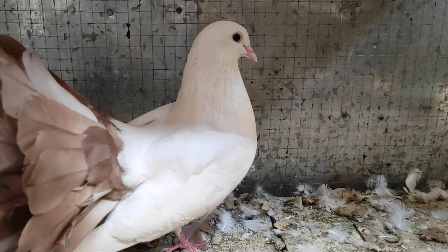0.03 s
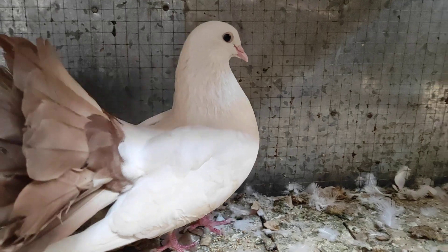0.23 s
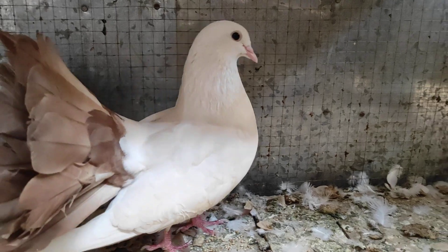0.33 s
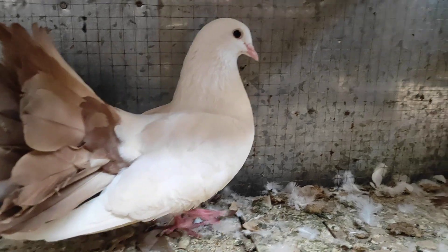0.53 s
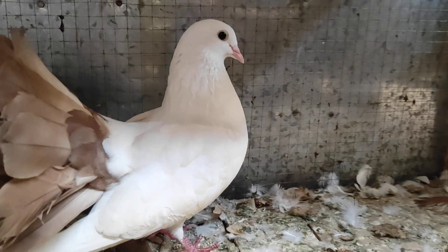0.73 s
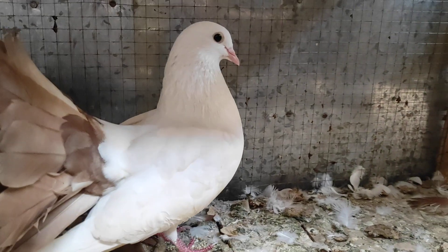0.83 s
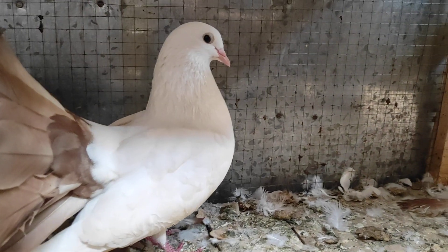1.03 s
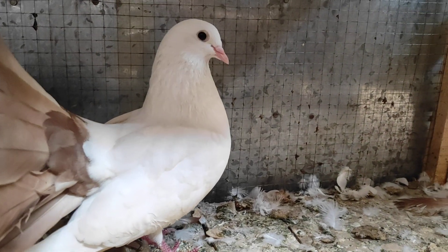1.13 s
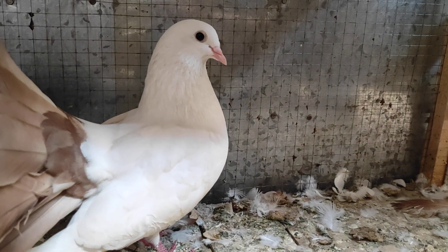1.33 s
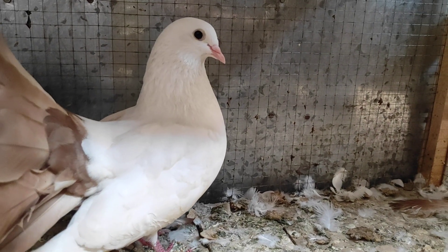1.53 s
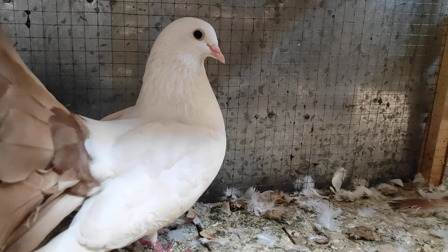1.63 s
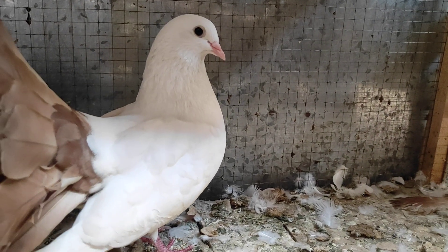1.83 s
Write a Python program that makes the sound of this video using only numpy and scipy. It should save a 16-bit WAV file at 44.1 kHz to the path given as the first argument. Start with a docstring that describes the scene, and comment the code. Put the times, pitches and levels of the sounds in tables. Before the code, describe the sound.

Light pigeon footsteps and soft feather rustling close by, over a faint hiss.

```python
"""A small aviary with a gritty floor, where a fantail pigeon shuffles round close to the microphone.
Its claws tap and scratch, its toes knock the board, its soles scuff and its weight bumps the floor.
Its feathers rustle, brush and flick past each other, and its swinging tail pushes air at the microphone.
The walls give a short echo; an outdoor rumble, a thin hiss and a swelling low hum lie underneath."""
import sys
import numpy as np
from scipy import signal
from scipy.fft import rfft, irfft
from scipy.io import wavfile

SR = 44100
rng = np.random.default_rng(int(sys.argv[2]) if len(sys.argv) > 2 else 0)


def to_wav(s):
    """Save 16-bit WAV."""
    ch = np.atleast_2d(s).T  # columns
    pcm = np.round(np.clip(ch, -1, 1) * 32767)  # PCM
    wavfile.write(sys.argv[1], SR, pcm.astype(np.int16))


N = 83790
T = np.arange(N) / SR

# Claw hits. Each row: start in seconds, level in dB, decay time in seconds, then the trims of the
# dull and the crisp layer in dB.
CLAW_HITS = [(0.2891, -40, 0.0023, -7, -10), (0.299, -50, 0.0016, -5, -12), (0.306, -46, 0.0029, -6.5, -17),
             (0.3144, -42.5, 0.0009, -2.5, -19), (0.5388, -45, 0.0019, -12, -30),
             (0.5533, -27.5, 0.0005, -9.5, -41), (.5578, -32, 0.00028, -1, -39),
             (.5822, -24, 0.00034, -10.5, -27), (0.7037, -27, 0.0021, -14.5, -12),
             (0.7065, -35.5, 0.00086, -3.5, -20), (0.7265, -46.5, 0.0013, 1, -20),
             (.7670, -50.5, 0.0017, -16, -22)]
# Toe knocks. Each row: start in seconds, level in dB.
TOE_KNOCKS = [(0.5401, -48), (.555, -43), (.5581, -42), (0.5838, -43.5), (0.7056, -44.5)]
# The ring of the floor board. Each row: pitch in Hz, trim in dB, time to fall 60 dB in seconds.
BOARD_MODES = [(992, -9.5, 0.048), (1304, -14, 0.028), (1773, -2, 0.02), (2490, -0.5, 0.014),
               (4480, -8, 0.0083)]
# Weight on the floor. Each row: start in seconds, level in dB, pitch in Hz, time to fall 60 dB in seconds.
FLOOR_BUMPS = [(.287, -42, 88, 0.063), (.3045, -39, 99, 0.027), (0.525, -39, 247, 0.032),
               (.557, -46.5, 306, 0.054), (0.7075, -34.5, 315, 0.055), (1.303, -46, 106.5, 0.082)]

# Friction cues. Each row: start in seconds, length in seconds, level in dB.
SOLE_SCUFFS = [(.118, 0.059, -60.5), (.372, 0.018, -59.5), (.403, 0.019, -50.5), (.492, 0.057, -60),
               (.535, 0.086, -63.5), (1.15, 0.043, -60.5)]
VANE_FLICKS = [(1.15, 0.031, -59.5), (1.275, 0.035, -69), (1.412, 0.023, -59), (1.466, 0.0072, -49.5),
               (1.5135, 0.0038, -45), (1.560, .02, -50), (1.607, 0.014, -50.5), (1.657, 0.023, -55.5),
               (1.700, 0.012, -60), (1.748, 0.02, -61)]
TIP_BRUSHES = [(.165, 0.11, -70), (.287, 0.024, -58.5), (.495, 0.078, -68), (1.145, 0.071, -66),
               (1.272, 0.067, -64), (1.41, 0.2, -69), (1.74, 0.054, -67), (1.78, 0.26, -72)]

# EQ curves. Each row: frequency in Hz, relative gain in dB.
CLAW_EQ = [(200, -26), (1500, -42), (3200, -10.5), (3900, -13.5), (4450, -6.5), (5100, -8.5), (5900, -3),
           (6450, 4.5), (6950, 4), (7400, -3.5), (8000, -0.5), (9000, -12), (10500, -25.5), (14000, -38),
           (16000, -58)]  # sharp claw
CRISP_EQ = [(1000, -19.5), (6000, 0), (9500, -7), (11500, -11), (14000, -12.5), (16000, -18)]  # crisp edge of grit and feather tips
FLOOR_EQ = [(100, -32), (300, 3.5), (600, 3.5), (1000, -0.5), (1350, 2), (1750, -4.5), (2100, -0.5),
            (2500, -2.5), (3200, -1), (5000, -8.5), (9000, -40)]  # dull floor under the claw
GRIT_EQ = [(200, 3.5), (600, -8), (1500, -2.5), (2800, 1), (4500, -7.5), (6800, -6), (8500, -7.5),
           (10500, -36), (15000, -37)]
PLUMAGE_EQ = [(300, -17.5), (1000, -1.5), (2500, -6.5), (3600, -3.5), (5000, -2), (6000, 0), (7000, 5),
              (8400, -1), (9300, -8.5), (10500, -25), (14000, -24.5), (16000, -45)]
VANE_EQ = [(300, -19), (1000, -16), (3200, -21), (4800, -5), (6000, -1.5), (7000, 4.5), (8400, -3.5),
           (10500, -17), (14000, -21), (16000, -46)]
BUFFET_EQ = [(3, -4), (12, -1), (25, -10), (50, -20), (120, -25), (500, -90)]
RUMBLE_EQ = [(15, -9.5), (28, -6), (42, -1.5), (58, -1.5), (80, -3), (115, -0.5), (160, -6), (240, -15.5),
             (370, -10.5), (550, -19.5), (900, -32.5), (2000, -76)]
HISS_EQ = [(60, -18.5), (240, -14.5), (550, -11.5), (800, -16), (1300, -22), (2400, -26), (4000, -33),
           (7000, -33), (9000, -36), (10000, -52.5), (12500, -43.5), (15000, -92)]

# Fader moves. Each row: time in seconds, level in dB.
RUSTLE_FADER = [(.07, -82), (.17, -61.5), (.27, -62.5), (.32, -57.5), (.35, -64), (.39, -62.5), (.45, -78),
                (.485, -70.5), (.505, -56), (.6, -70), (.68, -66.5), (.75, -62), (.83, -71), (.95, -71.5),
                (1.1, -65), (1.3, -63.5), (1.38, -62.5), (1.5, -61.5), (1.9, -62)]
BUFFET_FADER = [(.1, -90), (.16, -56), (.28, -48), (.35, -67), (.6, -56), (.9, -57), (1.9, -79)]
RUMBLE_FADER = [(.07, -100), (.12, -65.5), (.18, -55.5), (.3, -55.5), (.6, -53), (1.0, -54), (1.5, -52),
                (1.9, -54.5)]
HISS_FADER = [(.07, -67), (.15, -61), (.3, -60.5), (.6, -58.5), (.9, -61), (1.2, -60.5), (1.9, -61)]
HUM_FADER = [(.35, -79), (.46, -56), (.54, -49), (.65, -79), (.85, -76), (1.0, -63.5), (1.25, -52),
             (1.4, -82), (1.7, -63.5), (1.85, -59.5)]

# Stereo likeness of the noise beds. Each row: frequency in Hz, correlation of left and right.
BED_CORRELATION = [(40, 0.64), (120, 0.9), (350, 0.7), (700, 0.41), (1400, 0.045), (8000, 0.065)]
# Stereo balance. Each row: frequency in Hz, left minus right in dB.
BED_PAN = [(60, 4), (400, 5.5), (1300, 4.5), (2400, 7.5), (4400, -0.5), (8000, 3)]
PORT_PAN = [(1500, 0), (4700, 0.5), (5500, 1.5), (6200, -6), (7200, -7), (7900, 4), (8800, 0.5),
            (10500, -2.5), (15000, 0)]
# Early echoes off floor and walls. Each row: delay in seconds, level against the direct sound in dB.
EARLY_ECHOES = [(.0011, -9), (.0033, -11), (.0046, -8.5), (.0088, -12)]


def claws(snap_ratio=4.1):
    """Each claw lands with a snap and a brief scratch, in three layers: bright, crisp and dull."""
    bright, dull, crisp = np.zeros((3, 2, N))
    t = np.arange(0, .02, 1 / SR)
    for start, db, decay, dull_db, crisp_db in CLAW_HITS:
        noise = rng.standard_normal((2, 3, len(t)))  # claw and ground, each with left, right and centre
        scratch = (noise[:, :2] + 0.67 * noise[:, 2:]) * (t / decay) ** 0.33 * np.exp(-t / decay)
        attack_rms = np.sqrt(np.mean(scratch[..., :round(decay * SR)] ** 2))
        scratch[..., 0] += snap_ratio * attack_rms  # first touch
        scratch *= np.sqrt(decay * SR / 2) / np.linalg.norm(scratch, axis=-1, keepdims=True)
        claw, ground = scratch
        add(bright, start, amp(db) * claw)
        add(dull, start, amp(db + dull_db) * ground)
        add(crisp, start, amp(db + crisp_db) * ground)
    return eq(bright, CLAW_EQ) + eq(crisp, CRISP_EQ) + eq(dull, FLOOR_EQ) * pan(db=4.5)


def toe_knocks(attack_s=0.00053):
    """The board rings briefly under the toes, tuned a little differently at each spot."""
    out = np.zeros((2, N))
    t = np.arange(0, .1, 1 / SR)
    for start, db in TOE_KNOCKS:
        detunes = 1 + 0.021 * rng.uniform(-0.84, 1, len(BOARD_MODES))
        ring = sum(amp(mode_db - 60 * t / t60) * np.sin(2 * np.pi * hz * detune * t)
                   for (hz, mode_db, t60), detune in zip(BOARD_MODES, detunes))
        add(out, start, amp(db) * (1 - np.exp(-t / attack_s)) * ring)
    return out * pan(db=1)


def floor_bumps(attack_s=0.0028, overtone_ratio=1.85, overtone_db=-12.5):
    """The floor gives a short low note under the bird's weight."""
    out = np.zeros((2, N))
    t = np.arange(0, .2, 1 / SR)
    for start, db, hz, t60 in FLOOR_BUMPS:
        phase = 2 * np.pi * hz * t
        note = np.sin(phase) + amp(overtone_db) * np.sin(phase * overtone_ratio)
        envelope = amp(db - 60 * t / t60) * (1 - np.exp(-t / attack_s))
        add(out, start, envelope * note)
    return out * pan(db=2.3)


def sole_scuffs():
    """Grit drags under the soles in short, grainy strokes."""
    return eq(grains() * strokes(SOLE_SCUFFS), GRIT_EQ) * pan(db=2.5)


def feathers():
    """Barbs rub all the while, stiff vanes slip past each other in a quick run, and tips brush softly."""
    rustle = eq(grains() * fader(RUSTLE_FADER), PLUMAGE_EQ)
    flicks = eq(grains() * strokes(VANE_FLICKS), VANE_EQ)
    brushes = eq(grains(spread_db=5) * strokes(TIP_BRUSHES), CRISP_EQ)  # tips catch unevenly: papery
    return rustle + flicks + brushes


def tail_draught(start_s=0.15, attack_s=0.018, swing_hz=1.3, t60=3.5):
    """The tail pushes air at the microphone in one sudden push, which the microphone answers with a slow, dying
    swing; very deep buffeting follows."""
    t = np.maximum(T - start_s, 0)
    envelope = amp(-32.5 - 60 * t / t60) * (1 - np.exp(-t / attack_s))
    push = envelope * np.cos(2 * np.pi * swing_hz * t)
    return push + noise_bed(BUFFET_EQ) * fader(BUFFET_FADER)


def aviary_echo(x):
    """Floor and walls throw back a few close echoes, a quick scatter and a short tail."""
    t = np.arange(0, .4, 1 / SR)
    response = np.zeros((2, len(t)))
    fade_in = np.minimum(t / 0.002, 1)
    for t60, db in [(0.032, -2), (0.15, -8)]:  # scatter, then tail
        reverb = rng.standard_normal(response.shape) * amp(-60 * t / t60) * fade_in
        response += amp(db) * reverb / np.linalg.norm(reverb[0])
    response[:, 0] += 1  # direct sound
    for delay, db in EARLY_ECHOES:
        for ear, stretch in enumerate(rng.uniform(.88, 1.12, 2)):
            response[ear, int(delay * stretch * SR)] += amp(db)
    return signal.fftconvolve(x, response / np.linalg.norm(response[0]), axes=1)[:, :N]


def outdoors(hum_hz=42.5):
    """Distant rumble and thin hiss, with a low hum that swells and sinks."""
    hum = unit_rms(np.sin(2 * np.pi * (hum_hz * T + rng.random()))) * fader(HUM_FADER)
    rumble = noise_bed(RUMBLE_EQ) * fader(RUMBLE_FADER)
    hiss = noise_bed(HISS_EQ) * fader(HISS_FADER)
    return rumble + hiss + hum * pan(db=2.7)


def noise_bed(curve):
    """Shaped noise at an rms of 1, narrow in the bass, wide in the treble and leaning left."""
    hz = np.fft.rfftfreq(N, 1 / SR)
    left, independent = rfft(rng.standard_normal((2, N)))
    correlation = curve_at(BED_CORRELATION, hz)
    right = correlation * left + np.sqrt(1 - correlation ** 2) * independent
    spectrum = np.array([left, right]) * amp(curve_at(curve, hz)) * pan(curve_at(BED_PAN, hz))
    return unit_rms(irfft(spectrum, N))


def microphone_ports(x):
    """Each port colours the treble in its own way; the right one resonates near 6.8 kHz."""
    hz = np.fft.rfftfreq(2 * N, 1 / SR)
    gain = pan(curve_at(PORT_PAN, hz))
    gain /= np.sqrt(np.mean(gain ** 2, axis=0))  # constant power
    return irfft(rfft(x, 2 * N) * gain, 2 * N)[:, :N]


def grains(spread_db=2, slips_per_s=5000):
    """Friction texture: dense tiny slips of uneven size, at the same instants in both ears."""
    sizes = amp(spread_db * np.minimum(rng.exponential(1, N), 4))
    slips = rng.random(N) < slips_per_s / SR
    noise = rng.standard_normal((3, N))  # left, right, centre
    return unit_rms(sizes * slips * (noise[:2] + 0.14 * noise[2]))


def strokes(cues):
    """Envelope of short strokes that swell quickly and fade."""
    out = np.zeros(N)
    for start, length, db in cues:
        progress = np.clip((T - start) / length, 0, 1)
        out += amp(db) * np.sin(np.pi * progress ** 0.51) ** 2
    return out


def eq(x, curve, size=2048):
    """Minimum-phase EQ that follows a curve and keeps the power of white noise."""
    hz = abs(np.fft.fftfreq(size, 1 / SR))
    log_gain = np.log(amp(curve_at(curve, hz)))
    taps = np.fft.ifft(np.exp(np.conj(signal.hilbert(log_gain)))).real
    return signal.oaconvolve(x, taps[None] / np.linalg.norm(taps), axes=1)[:, :N]


def curve_at(curve, hz):
    """Reads a curve on a log-frequency axis."""
    points_hz, values = np.transpose(curve)
    return np.interp(np.log(hz + 1), np.log(points_hz), values)


def fader(moves):
    """Gain over time, gliding in dB from point to point."""
    return amp(np.interp(T, *np.transpose(moves)))


def pan(db):
    """Left and right gains; positive dB leans left."""
    return amp(np.array([[.5], [-.5]]) * db)


def amp(db):
    """Decibels to gain."""
    return 10 ** (np.asarray(db) / 20)


def unit_rms(x):
    """Scales to an rms of 1."""
    return x / np.sqrt(np.mean(x ** 2) + 1e-20)


def add(mix, start_s, sound):
    """Drops a sound into the mix at its cue."""
    part = mix[:, max(round(start_s * SR), 0):][:, :sound.shape[-1]]
    part += sound[..., :part.shape[1]]


def scene():
    """Claws, soles, feathers and toes feed the echo; bumps, outdoors and draught stay dry."""
    bird = claws() + sole_scuffs() + feathers() + toe_knocks()
    return aviary_echo(bird) + floor_bumps() + outdoors() + tail_draught()


def record(dry, silence_s=0.064, fade_s=0.0095, cutoff_hz=15600):
    """Microphone colour, a quick fade-in after a moment of silence, and a steep high cut."""
    faded = microphone_ports(dry) * np.clip((T - silence_s) / fade_s, 0, 1)
    high_cut = signal.firwin(511, cutoff_hz, window=("kaiser", 9), fs=SR)
    return signal.oaconvolve(faded, high_cut[None], "same")


dry = scene()
out = record(dry)
to_wav(out)
```